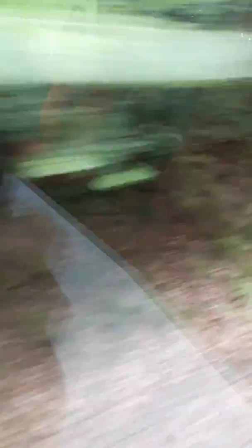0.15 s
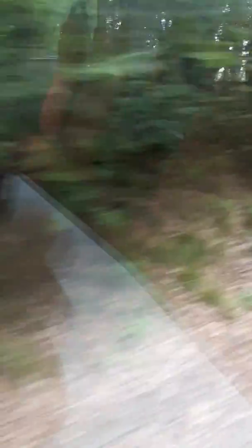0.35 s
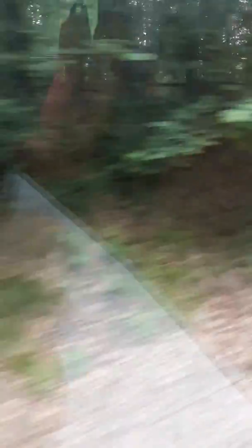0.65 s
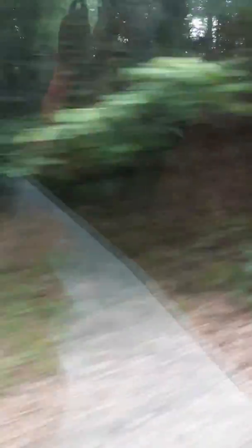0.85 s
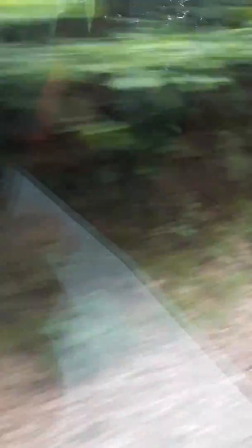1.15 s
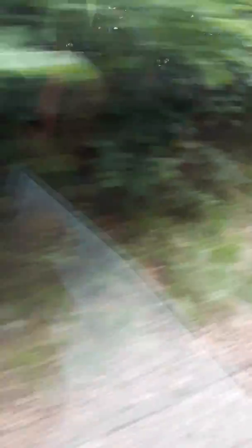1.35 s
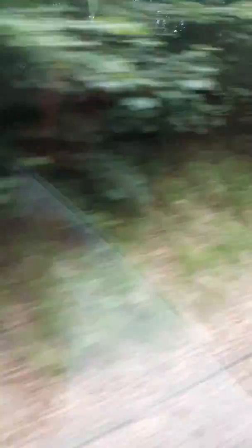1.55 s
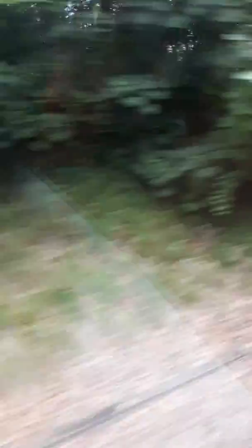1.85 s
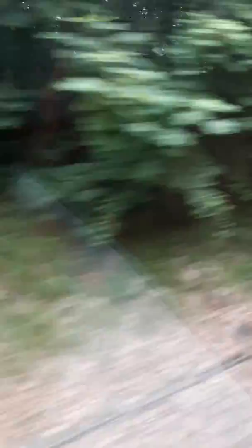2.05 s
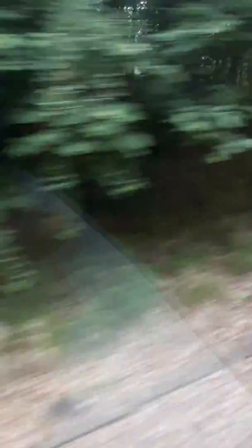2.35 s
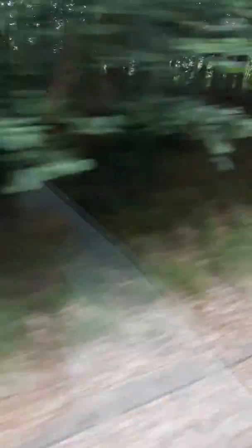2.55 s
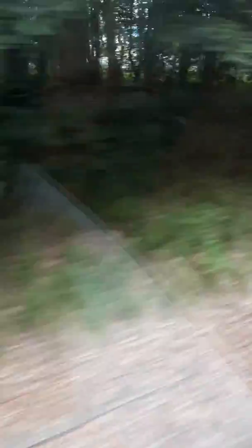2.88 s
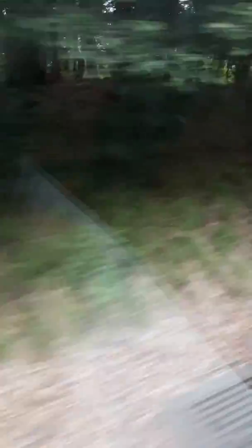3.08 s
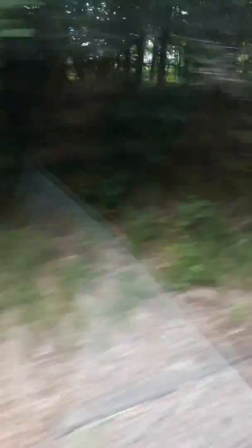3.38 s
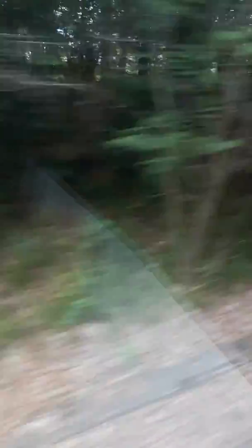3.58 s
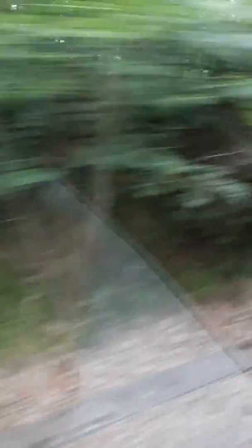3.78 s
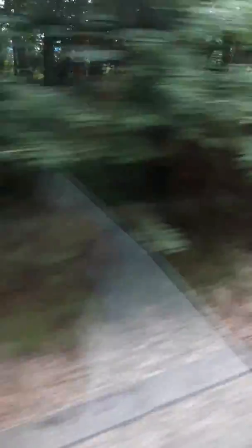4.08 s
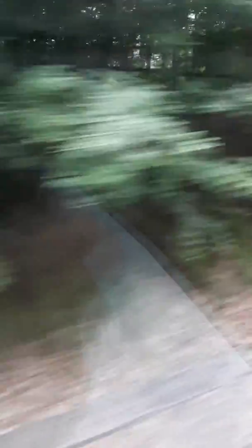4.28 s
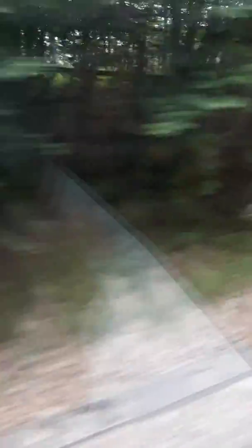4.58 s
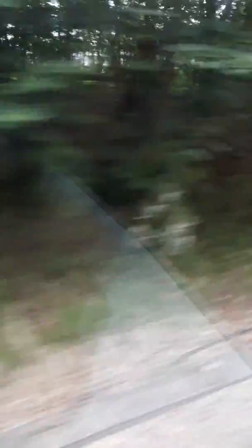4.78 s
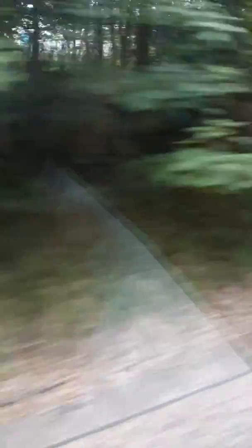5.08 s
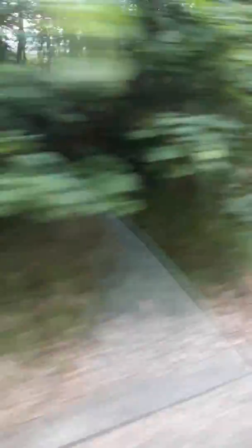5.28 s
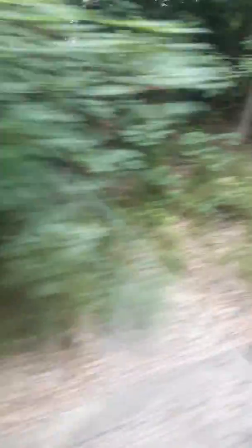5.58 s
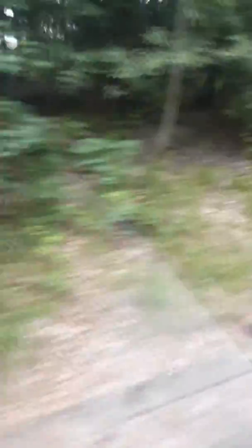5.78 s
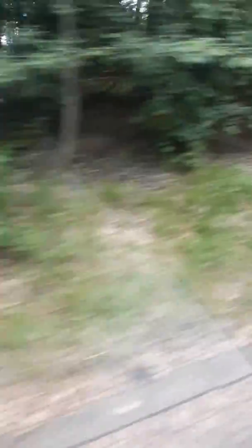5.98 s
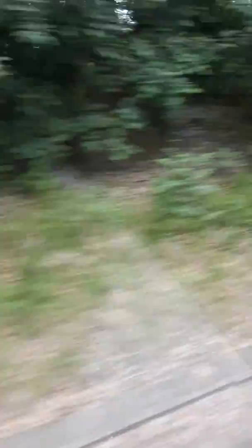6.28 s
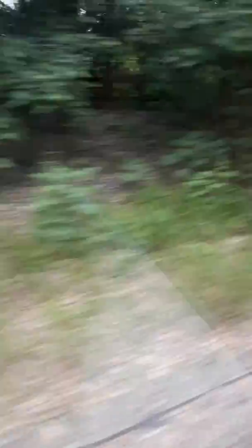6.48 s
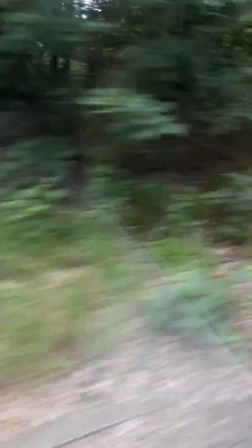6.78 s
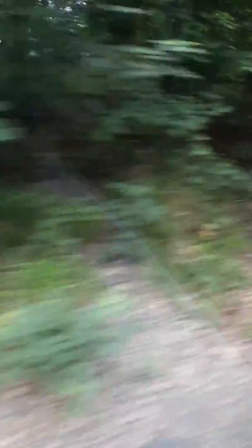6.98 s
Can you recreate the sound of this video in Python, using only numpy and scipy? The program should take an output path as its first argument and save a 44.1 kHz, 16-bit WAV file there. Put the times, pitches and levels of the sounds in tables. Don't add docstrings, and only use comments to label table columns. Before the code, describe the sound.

Inside a moving railcar, a low wheel rumble swells with booming rail joints, then three sharp knocks land close by on the window glass.

```python
import sys
import numpy as np
from scipy import signal
from scipy.fft import rfft, irfft, next_fast_len
from scipy.io import wavfile
from scipy.ndimage import uniform_filter1d, minimum_filter1d

SR = 44100
rng = np.random.default_rng(int(sys.argv[2]) if len(sys.argv) > 2 else 0)


def field_ratio(decibels):
    return 10 ** (np.asarray(decibels, dtype=float) / 20)


def waveform_to_disk(signal):
    frames = np.transpose(np.atleast_2d(signal))
    scaled = np.clip(frames, -1, 1) * 32767
    samples = np.round(scaled).astype(np.int16)
    wavfile.write(sys.argv[1], SR, samples)


N = 314653
TIME = np.arange(N) / SR
SIZE = 2 * next_fast_len(N // 2 + SR // 4)
FREQ = np.maximum(np.arange(SIZE // 2 + 1) * SR / SIZE, 1)


def level(x, db):
    return x * field_ratio(db) / np.sqrt(np.mean(x ** 2))


def noise():
    return rng.standard_normal(N)


def curves(table):
    s, *columns = np.transpose(table)
    return [np.interp(TIME, s, column) for column in columns]


def colour(points):
    hz, db = np.transpose(points)
    return field_ratio(np.interp(np.log(FREQ), np.log(hz), db, left=-120, right=-120))


def lift(peaks):
    return field_ratio(sum(db / (1 + (2 * (FREQ - hz) / width) ** 2) for hz, width, db in peaks))


def shape(x, gain):
    return irfft(rfft(x, SIZE) * gain, SIZE)[:N]


def walk(rate):
    hold = int(SR / rate)
    steps = np.repeat(rng.standard_normal(N // hold + 1), hold)
    return 1.3 * uniform_filter1d(uniform_filter1d(steps, hold), hold)[:N]


def glide(hz):
    return np.sin(2 * np.pi * np.cumsum(hz) / SR)


def ring(age, hz, t60):
    out, sounding = np.zeros(N), (age >= 0) & (age < 2 * t60)
    age = age[sounding]
    out[sounding] = np.cos(2 * np.pi * hz * age) * np.exp(-np.log(1000) * age / t60)
    return out


def struck(age, modes):
    return sum(field_ratio(db) * ring(age, hz, t60) for hz, db, t60 in modes)


def soften(x, contact_ms):
    push = np.sin(np.pi * np.clip(TIME[:256] / (contact_ms / 1000), 0, 1)) ** 2
    return signal.fftconvolve(x, push / push.sum())[:N]


def wide_note(table, width_hz):
    hz, db = curves(table)
    breadth = level(shape(noise(), np.exp(-(FREQ / width_hz) ** 2)), 3)
    fade = np.clip(np.minimum(TIME - table[0][0] + .4, table[-1][0] - TIME) / .4, 0, 1)
    return fade * field_ratio(db) * breadth * glide(hz)


ROAR_HZ = [60, 180, 550, 1500]
# (frequency [Hz], density [dB per Hz])
ROAR_COLOUR = [(18, -20.5), (30, -9), (48, -2), (86, 6.5), (114, 8), (157, -1), (208, 5.5), (250, 9.5),
               (540, -13.5), (820, -17), (1060, -24), (1940, -30.5), (2280, -40.5), (2560, -52),
               (6500, -89.5)]
# (frequency [Hz], width [Hz], lift [dB])
CABIN = [(158.3, 45.7, 12), (247, 55, 0.5), (328, 12, 2.5), (581, 31, 3.5), (956, 16, 3.5), (1820, 250, -2)]
# (time [s], rail roughness [dB], body sway [dB])
TRACK = [(.12, -19.5, 4), (.6, -19, -5), (1.15, -15.5, -4.5), (1.5, -9.5, -3.5), (1.8, -9.5, -13),
         (2.1, -6, 6.5), (2.45, -6.5, -11.5), (2.9, -3.5, -2), (3.25, -2, -7), (3.7, 0.5, 1.5),
         (4.35, 3.5, 0), (4.8, 3, 0), (5.25, -4, 1.5), (5.65, -9.5, 8), (6.1, -7, 5.5), (6.4, -2.5, 1),
         (6.8, -9.5, -1.5), (7.13, -4, 10)]
FOLLOWS = [(.05, 0.86), (.4, 0.17), (.55, 0.043), (1.011, 0.011)]


def roar():
    spectrum = rfft(level(shape(noise(), colour(ROAR_COLOUR) * lift(CABIN)), -25.0), SIZE)
    parts_db = np.array(FOLLOWS) @ np.array(curves(TRACK))
    out, shared = 0, walk(7.7)
    for octave in np.arange(4, 13.5, .5):
        window = np.cos(np.pi * np.clip(np.log2(FREQ) - octave, -.5, .5)) ** 2
        weights = [np.interp(octave, np.log2(ROAR_HZ), row) for row in np.eye(4)]
        swell_db = weights @ parts_db + 0.35 * shared + 1.2 * walk(15)
        out = out + field_ratio(swell_db) * irfft(spectrum * window, SIZE)[:N]
    return out


# (time [s], peak level [dB], frequency [Hz], swell [ms])
JOINTS = [(0.639, -26.5, 257, 22), (0.659, -27.5, 191.4, 27), (1.04, -28, 251.5, 24.4),
          (1.08, -23.5, 104.6, 23), (1.734, -18.5, 149, 30), (1.878, -18.5, 167, 19.6),
          (2.128, -11, 154.4, 27), (2.987, -18, 157, 31), (3.094, -20.5, 148.5, 16), (3.196, -19, 147, 13),
          (3.357, -18, 144, 20), (3.454, -13, 152.4, 22), (3.689, -22, 149, 27), (3.876, -10, 155.8, 18.6),
          (4.029, -16, 133, 8.1), (4.19, -20.5, 122.4, 17), (4.269, -19, 149.7, 20),
          (4.814, -21, 126.6, 44), (5.181, -23, 133, 42), (5.304, -24, 146, 33), (6.79, -24.5, 210, 20),
          (7.065, -28, 170.3, 11.4)]
OVERTONE_DB, OVERTONE_RATIO = -14, 1.4


def joints():
    out, lead_s = np.zeros(N), .012
    for s, db, hz, swell_ms in JOINTS:
        near = (TIME > s - lead_s) & (TIME < s + .3)
        age = TIME[near] - s
        swell = (age + lead_s) / (swell_ms / 1000)
        envelope = swell ** 2 * np.exp(2 - 2 * swell)
        phase = 2 * np.pi * hz * age
        boom = np.sin(phase) + field_ratio(OVERTONE_DB) * np.sin(OVERTONE_RATIO * phase)
        out[near] += field_ratio(db) * envelope * boom
    return out


# (time [s], frequency [Hz], level [dB])
HUM = [
    [(2.25, 247, -42.5), (2.6, 244, -25), (2.9, 243, -34)],
    [(5.3, 200.3, -42.5), (5.7, 207, -37.5), (6.0, 213.1, -27), (6.4, 222, -47)],
    [(6.3, 108, -48), (6.8, 115, -28.5), (7.3, 132, -37)],
]


def hum():
    out = 0
    for table in HUM:
        hz, db = curves(table)
        fade = np.clip(np.minimum(TIME - table[0][0], table[-1][0] - TIME) / 0.088, 0, 1)
        strength = fade * field_ratio(db + 3 * walk(14))
        out = out + strength * glide(hz * (1 + .012 * walk(15)))
    return out


# (frequency [Hz], level [dB])
TICK = [(11000, -32), (13000, -20), (13700, -13), (14400, -15), (15200, -8), (15600, 0), (15800, -2),
        (16000, -30)]
# (frequency [Hz], level [dB])
RASP = [(1600, -28.5), (1850, 12), (2100, -2), (2700, -0.5), (3200, -4), (3600, -6), (3850, -15.5),
        (5250, -18.5), (5520, -11), (5800, -18), (8000, -46)]
# (frequency [Hz], width [Hz], lift [dB])
PANEL = [(1829, 45, 9), (3400, 79, 6), (3680, 88, 7)]
BUZZ_HZ, BUZZ_START_S = 36.548, .0204
THROTTLE_S, SPOOL_S, POWER_OFF_S, DIES_DB_PER_S = 1.45, 0.82, 3.64, 131
TICK_IDLE_DB, TICK_LOAD_DB, RASP_IDLE_DB, RASP_LOAD_DB = -80, 6, -78.5, 16.5


def buzz():
    beats = (TIME - BUZZ_START_S) * BUZZ_HZ + 1
    age = beats % 1 / BUZZ_HZ
    force = field_ratio(2.8 * rng.standard_normal(N // 1000))[beats.astype(int)]
    load = 1 - np.exp(-np.maximum(TIME - THROTTLE_S, 0) / SPOOL_S)
    dying_db = -DIES_DB_PER_S * np.maximum(TIME - POWER_OFF_S, 0)
    slap = force * age / .0014 * np.exp(1 - age / .0014)
    scrub = force ** .5 * np.exp(-age / .009)
    tick = level(shape((slap + .2) * noise(), colour(TICK)), TICK_IDLE_DB)
    rasp = level(shape((scrub + .36) * noise(), colour(RASP) * lift(PANEL)), RASP_IDLE_DB)
    return field_ratio(dying_db) * (field_ratio(TICK_LOAD_DB * load) * tick + field_ratio(RASP_LOAD_DB * load) * rasp)


# (time [s], level [dB], thud level [dB], contact [ms])
KNOCKS = [
    (5.71216, 6.0, 3.5, .98),
    (5.76109, 5.8, 4.5, .93),
    (5.77272, 1.0, 8.7, .94),
]
# (frequency [Hz], level [dB], t60 [s])
PANE = [(690, -10.8, .0085), (836, -5.3, .019), (1400, -.5, .007)]
# (frequency [Hz], level [dB], t60 [s])
THUD = [(200, -7.8, .0113), (119, -10.7, .0142)]
# (frequency [Hz], level [dB], t60 [s])
CASE = [(2410, -38, .011), (3200, -28, .0042), (4300, -37, .004)]


def knocks():
    out = np.zeros(N)
    tail_colour = colour([(700, -5), (1000, 0), (2500, -9), (4800, -15), (5450, 5), (7000, -30)])
    tail = level(shape(noise(), tail_colour), -69)
    for s, db, thud_db, contact_ms in KNOCKS:
        age = TIME - s
        thud = struck(age, THUD[:1]) - struck(age, THUD[1:])
        body = soften(struck(age, PANE) + field_ratio(thud_db) * thud, contact_ms)
        click = struck(age - .44 * contact_ms / 1000, CASE)
        answer = tail * (age > 0) * np.exp(-np.abs(age) / .06)
        out += field_ratio(db) * (body + click + answer)
    return signal.sosfilt(signal.butter(10, 4850, fs=SR, output="sos"), out)


# (time [s], length [s], frequency [Hz], level [dB])
FLANGE = [
    (1.507, .2, 586.5, -53.5),
    (3.749, .2, 1997, -62),
    (3.804, .12, 2710, -76),
    (4.19, .05, 2740, -79),
    (4.199, 0.54, 3400, -84),
    (4.487, 0.085, 2810, -71),
    (4.671, .05, 374.5, -34),
    (5.27, 0.029, 3400, -78.5),
]
SCRAPE_WIDTH_HZ, SCRAPE_SPREAD_HZ = 21, 12000


def flange():
    out = 0
    for s, length, hz, db in FLANGE:
        width_hz = SCRAPE_WIDTH_HZ + hz ** 2 / SCRAPE_SPREAD_HZ
        scrape = walk(width_hz) * np.sin(2 * np.pi * hz * TIME)
        out = out + field_ratio(db + 3) * scrape * np.exp(-((TIME - s) / length) ** 2)
    return out


# (time [s], frequency [Hz], level [dB])
RAIL_SONG = [
    (3.6, 650, -54.5),
    (4.3, 770, -51.5),
    (5.1, 867, -50.5),
]


def rail_song():
    return wide_note(RAIL_SONG, 50)


# (frequency [Hz], level [dB], t60 [s])
CHATTER_MODES = [(953, 3, 0.098), (576, -2, 0.088), (746, -6, 0.077), (1150, -13.5, .04)]
TURN_S, FIRST_TURN_S = .08, 1.067
CHATTER_DB, CHATTER_PEAK_S, CHATTER_SPAN_S = -46, 1.55, .13


def chatter():
    turns = FIRST_TURN_S + TURN_S * np.arange(10)
    turn_db = CHATTER_DB - ((turns - CHATTER_PEAK_S) / CHATTER_SPAN_S) ** 2
    blows = sum(field_ratio(db) * struck(TIME - s, CHATTER_MODES) for s, db in zip(turns, turn_db))
    return soften(soften(blows, .7), .7)


# (time [s], peak level [dB], frequency [Hz])
CLUNKS = [
    (2.098, -31.5, 304.4),
    (3.417, -30.5, 328),
    (4.9, -26.5, 350),
    (5.016, -21, 295),
    (5.07, -21.5, 299),
    (5.195, -28, 444),
    (6.45, -29, 333),
    (6.547, -25, 301),
]


def clunks():
    blows = sum(field_ratio(db + 7.5) * ring(TIME - s, hz, .027) for s, db, hz in CLUNKS)
    return soften(soften(blows, 1.1), 1.1)


# (time [s], peak level [dB], frequency [Hz])
CREAKS = [
    (5.184, -69, 2530),
    (5.234, -66, 2910),
    (5.265, -65, 3320),
    (5.994, -42.5, 1410),
]


def creaks():
    return soften(sum(field_ratio(db) * ring(TIME - s, hz, .004) for s, db, hz in CREAKS), .2)


# (time [s], frequency [Hz], level [dB])
GRILLE = [
    (3.45, 4950, -86),
    (3.8, 4850, -84),
    (4.2, 4700, -86),
    (4.6, 4550, -92),
]


def grille():
    return wide_note(GRILLE, 520)


def scene():
    track = roar() + joints() + hum() + flange() + rail_song()
    body = buzz() + knocks() + chatter() + clunks() + creaks()
    return (track + body + grille())[None]


def top_cut(x):
    return signal.sosfilt(signal.butter(12, 16950, fs=SR, output="sos"), x)


# (frequency [Hz], density [dB per Hz])
HISS = [(2060, -18), (3500, -11), (7510, -17.5), (10800, -17.5), (15100, -12), (16000, -13.5)]
HISS_DB = -78.5
DUCK_DB, DUCK_S, DUCK_TAKES_S, RECOVER_S, RECOVER_TAKES_S = -4.5, 5.78, 0.17, 6.9, .12


def record(dry):
    hiss = level(shape(noise(), colour(HISS)), HISS_DB)
    falling = np.clip((TIME - DUCK_S) / DUCK_TAKES_S, 0, 1)
    ducked = falling - np.clip((TIME - RECOVER_S) / RECOVER_TAKES_S, 0, 1)
    room_left = np.minimum(1, .97 / (np.abs(dry) + 1e-9))
    lowest = minimum_filter1d(room_left, size=257)
    limiter = uniform_filter1d(uniform_filter1d(lowest, size=128), size=128)
    fade_in = np.minimum(TIME / .002, 1)
    mix = (dry * limiter + hiss)[0] * field_ratio(DUCK_DB * ducked) * fade_in
    return top_cut(shape(mix, FREQ < 15800)[None])


dry = scene()
out = record(dry)
waveform_to_disk(out)
```